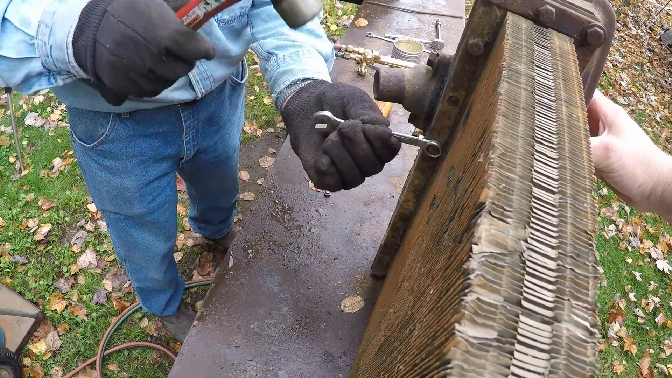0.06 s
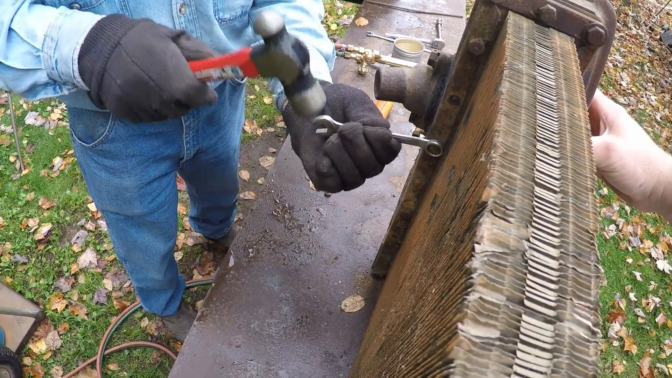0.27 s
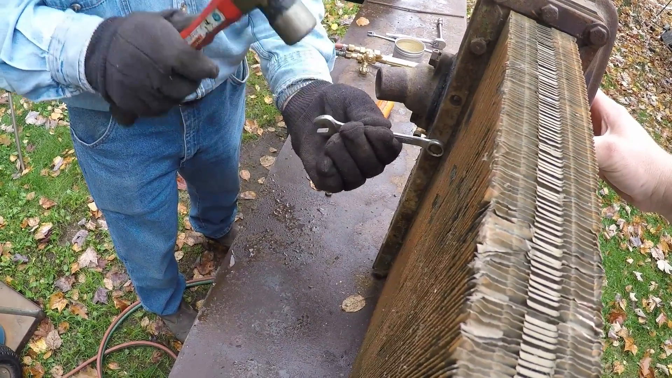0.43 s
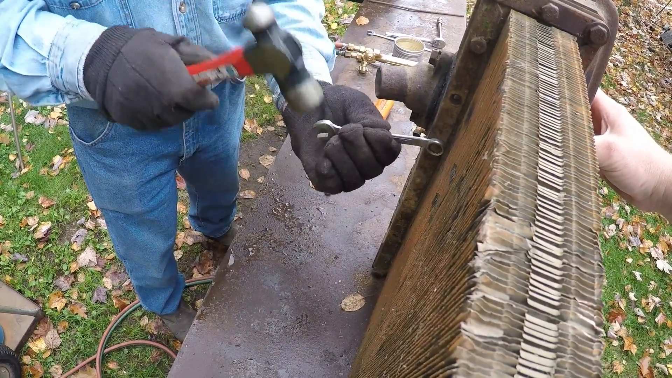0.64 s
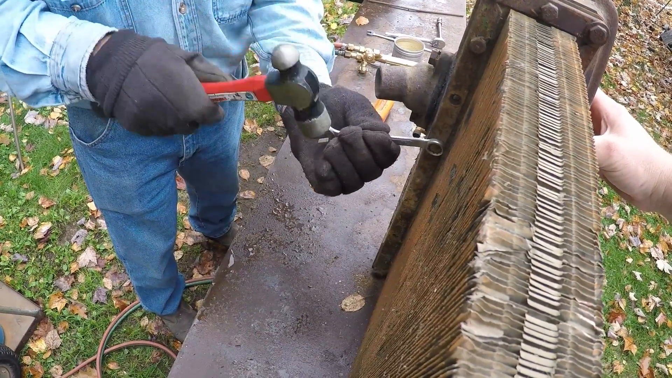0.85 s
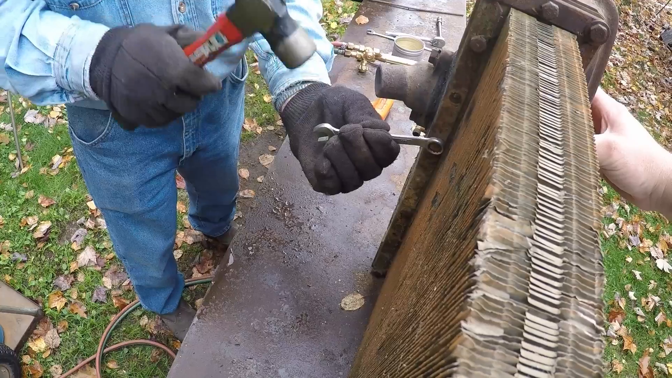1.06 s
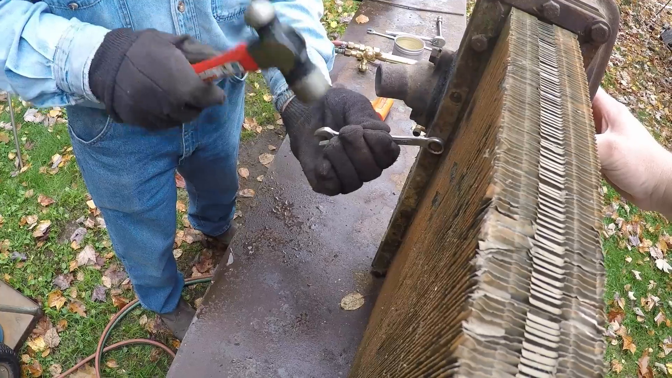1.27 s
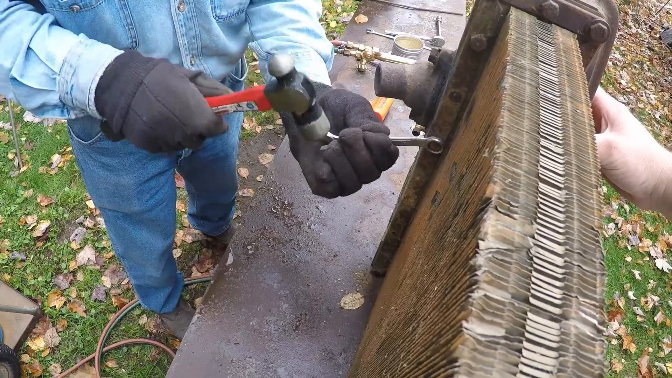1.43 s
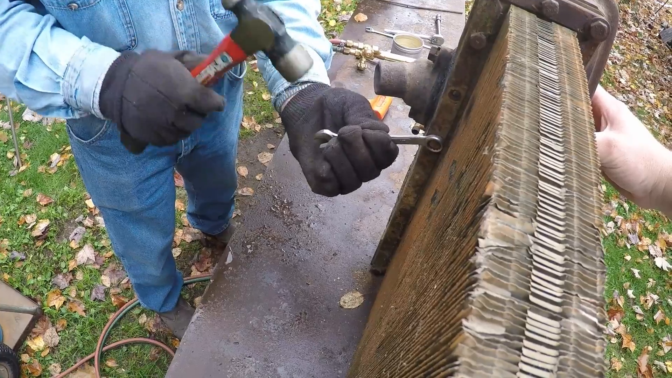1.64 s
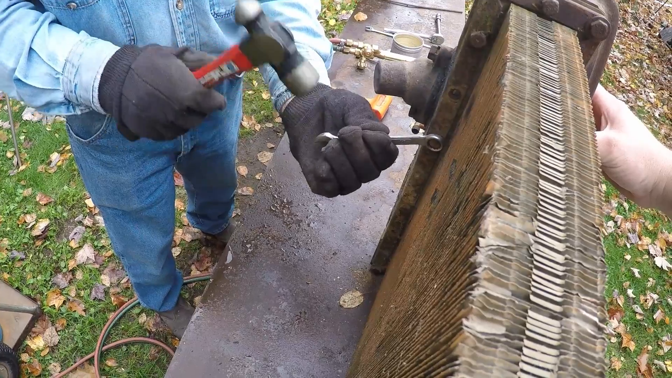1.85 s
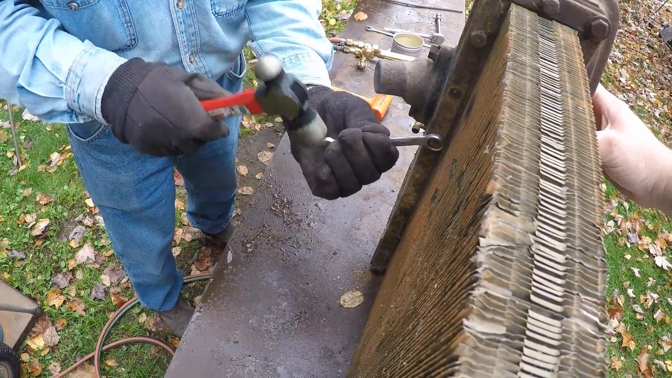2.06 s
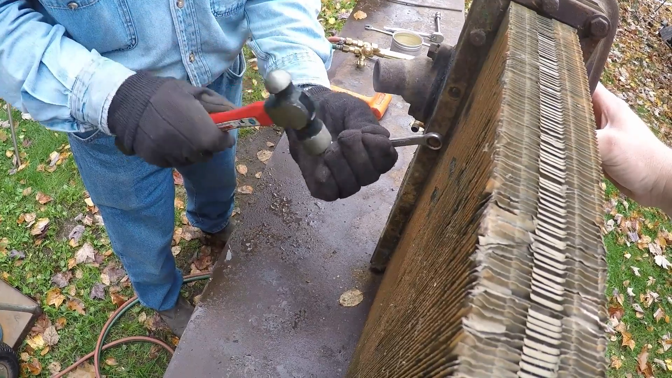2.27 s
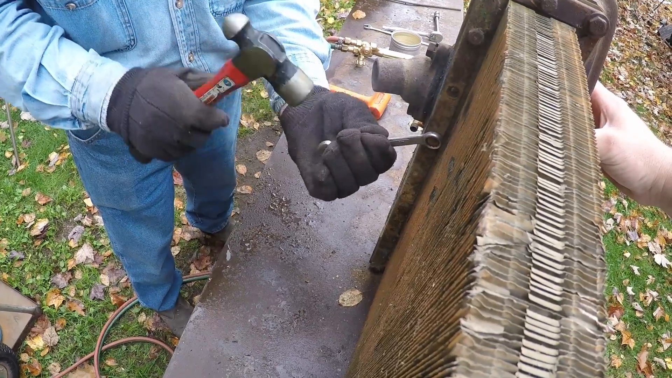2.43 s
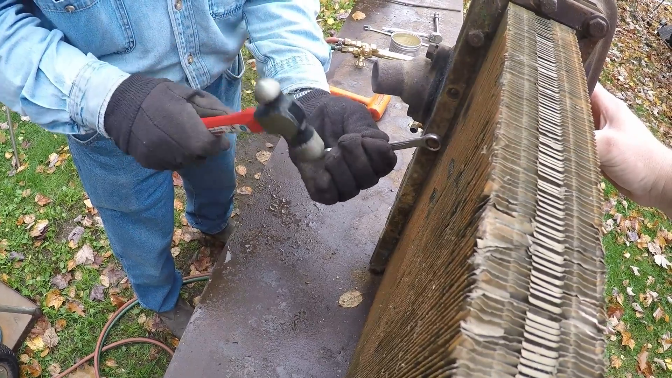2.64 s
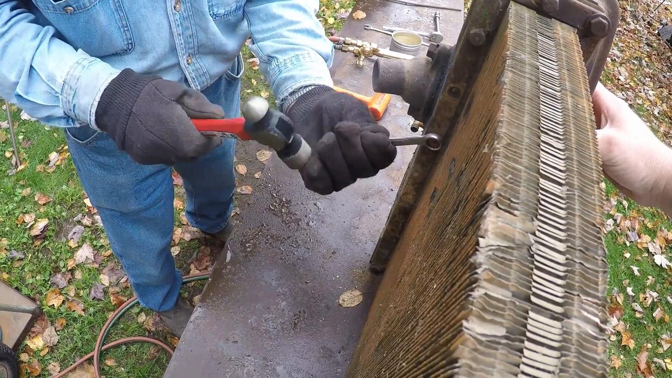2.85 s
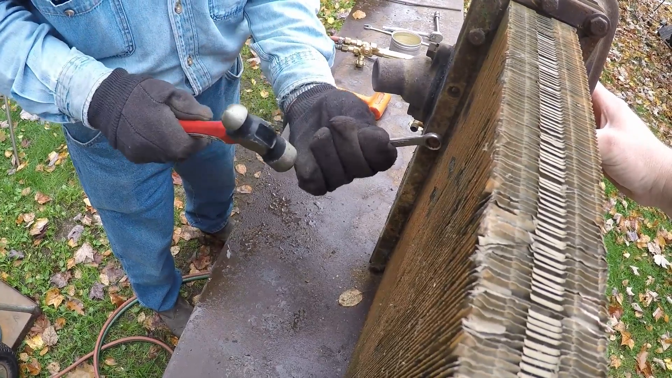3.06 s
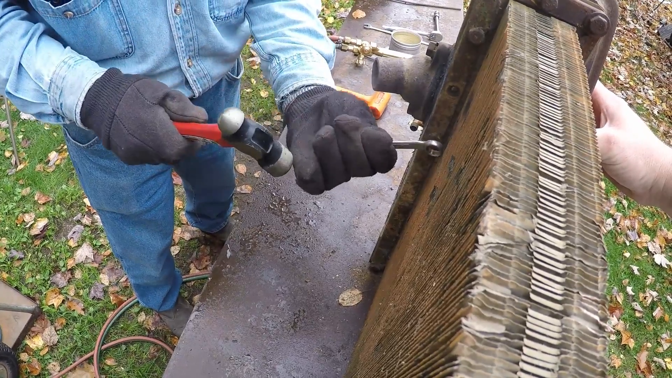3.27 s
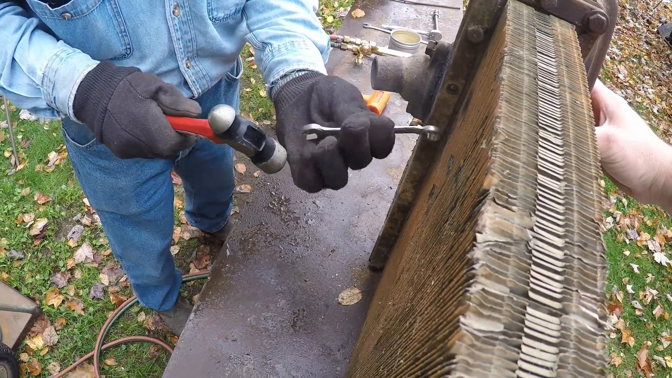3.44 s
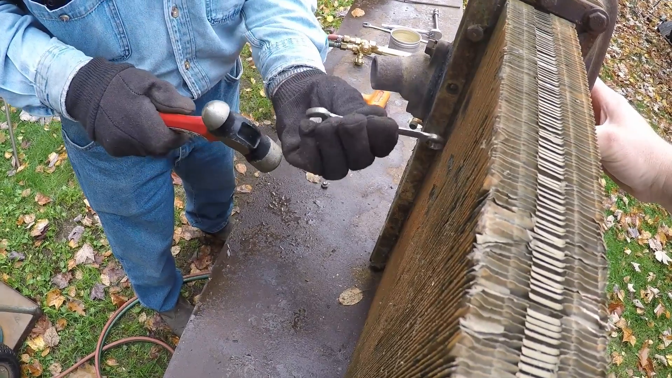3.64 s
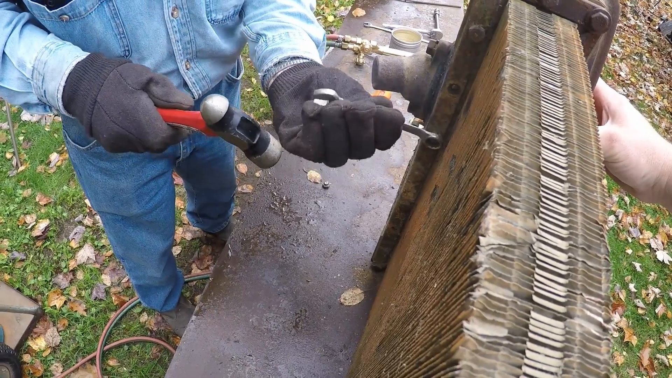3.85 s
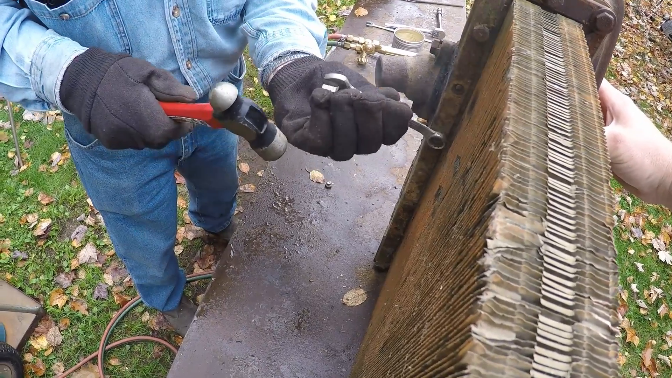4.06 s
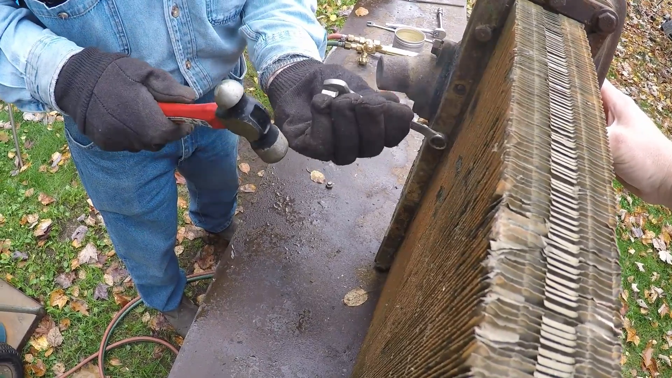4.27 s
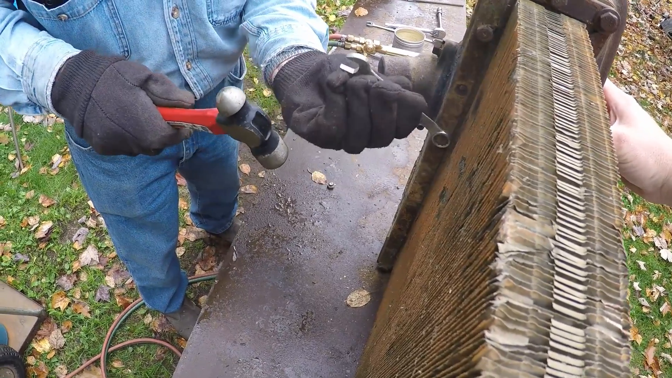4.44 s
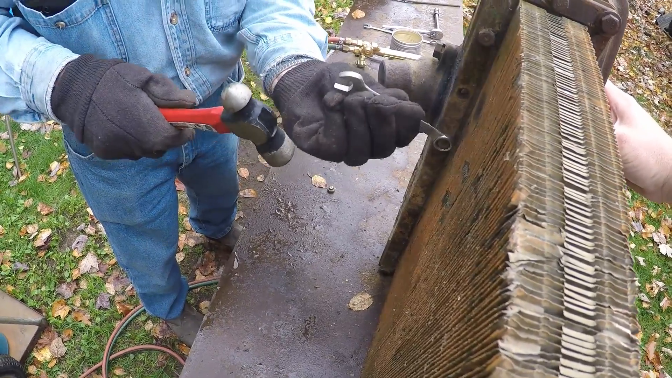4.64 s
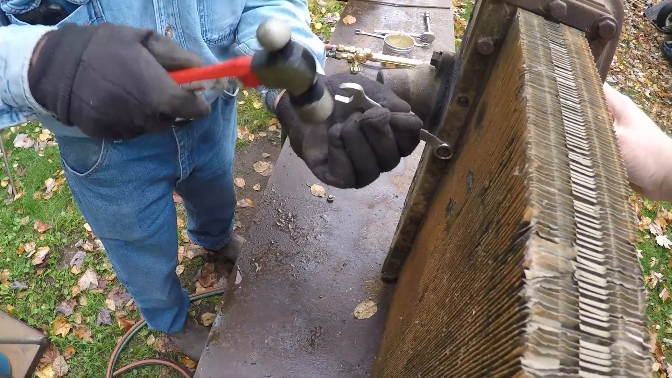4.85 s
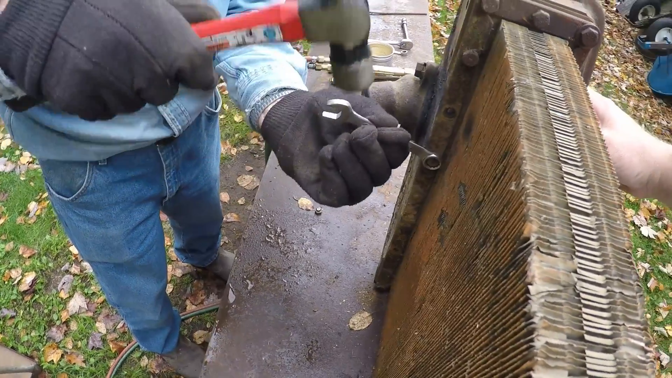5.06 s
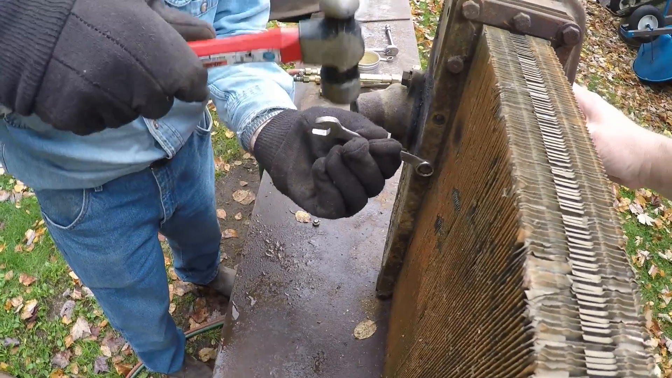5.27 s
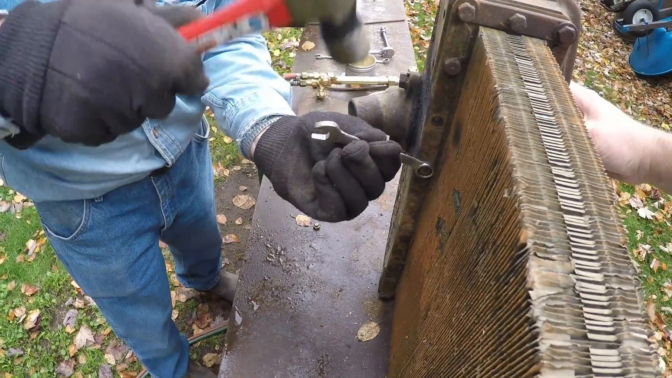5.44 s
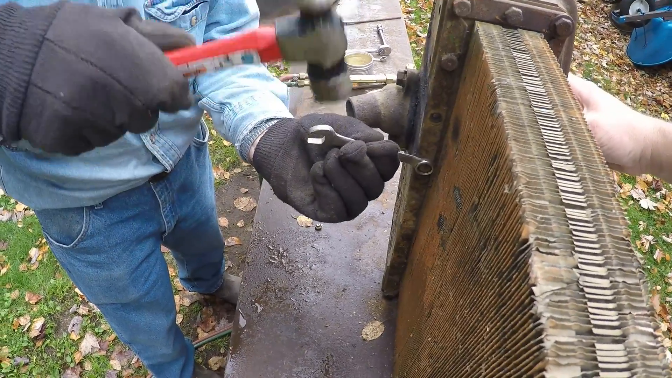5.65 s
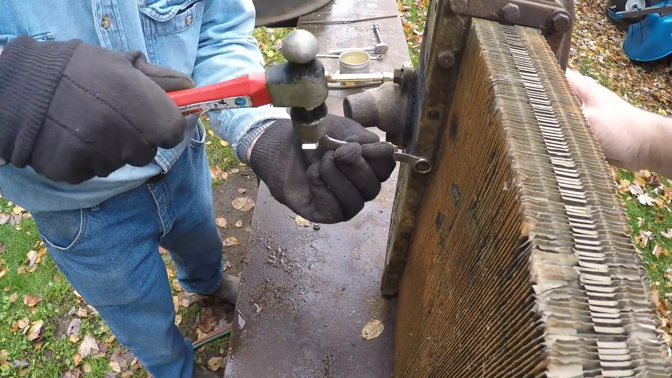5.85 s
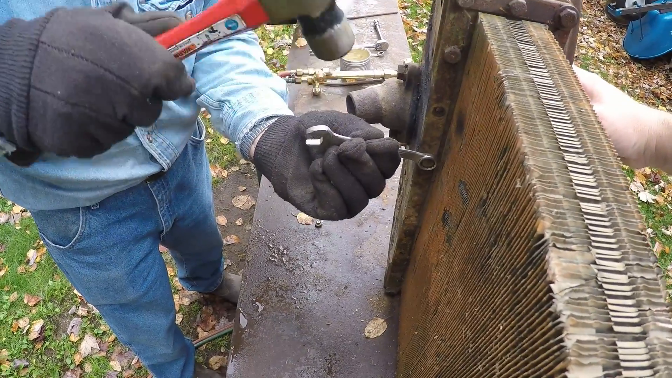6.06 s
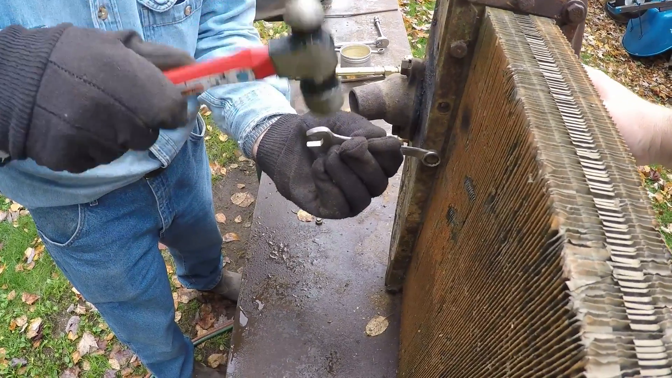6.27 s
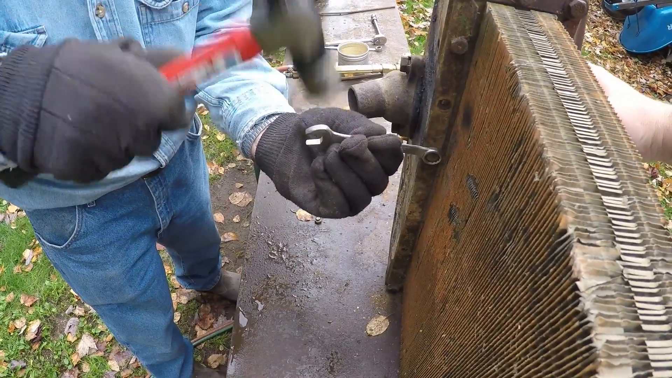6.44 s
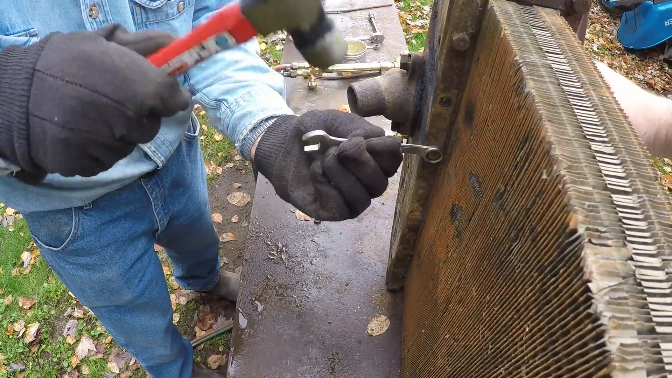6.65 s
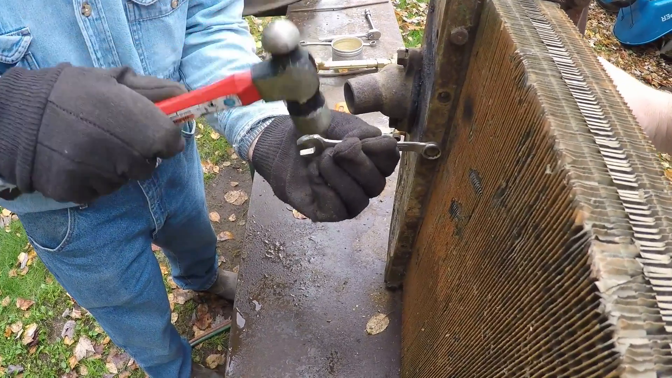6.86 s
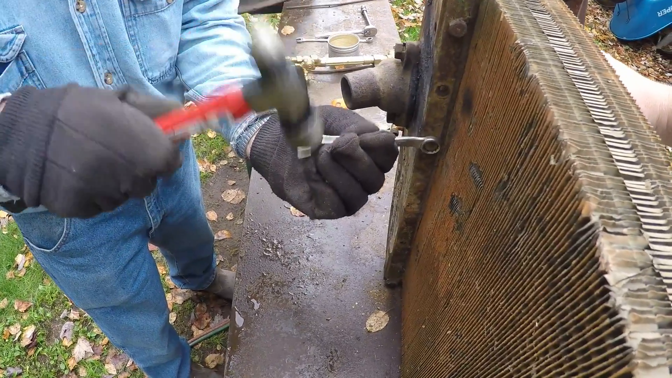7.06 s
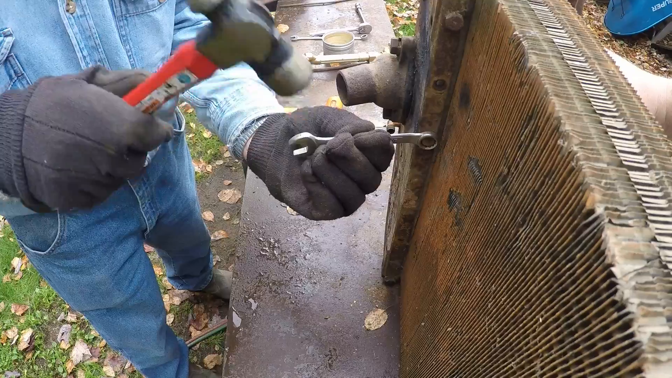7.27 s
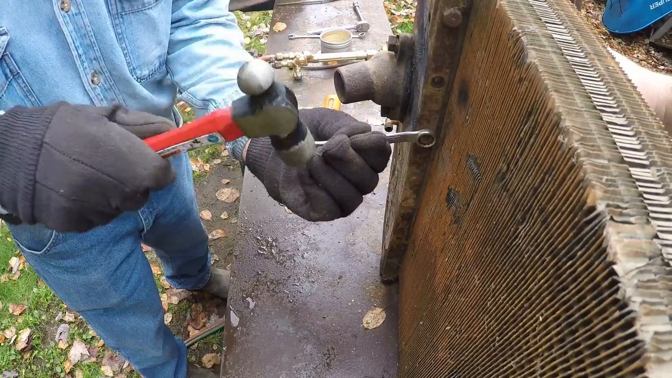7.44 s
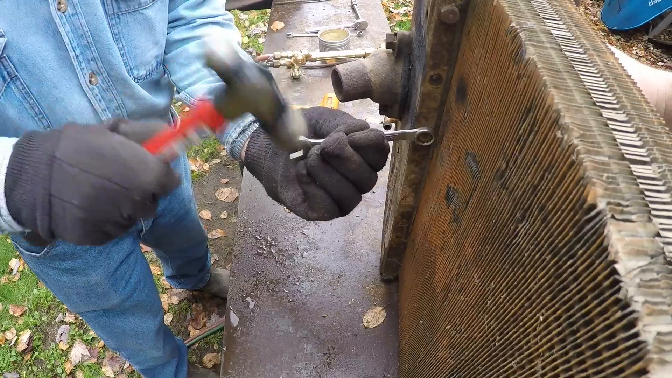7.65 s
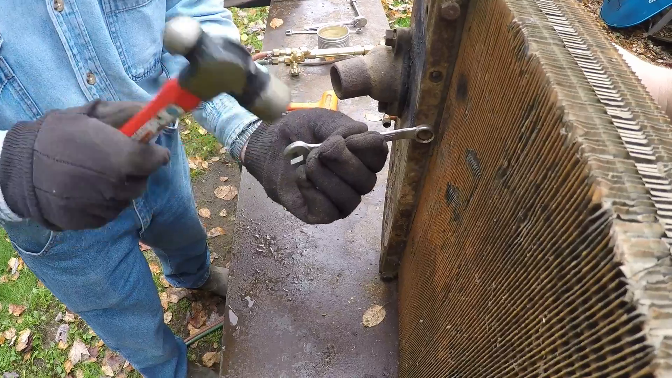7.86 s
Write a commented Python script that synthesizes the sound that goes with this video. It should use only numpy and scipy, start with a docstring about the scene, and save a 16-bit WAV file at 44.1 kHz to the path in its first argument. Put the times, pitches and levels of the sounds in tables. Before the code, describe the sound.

Close, hard hammer blows on a steel wrench held against a bolt in an old metal radiator. Nine quick sharp clanks come first, slightly speeding up, then a pause with wind thumps and two light clinks as the wrench is reseated, then nine more with a fuller, gong-like ring. Open yard, faint traffic and engine hum, microphone very near and slightly overloaded.

```python
"""Hammering a wrench on a stuck bolt

Outdoors, a hammer strikes a hand-held wrench on a bolt in a sheet-metal radiator: two runs of nine blows.
Two small clinks sound as the wrench is reseated, and four dull knocks are scattered through the scene.
Clear metal rings are fading sine waves; the clatter of the sheets is noise that dies away band by band.
Wind, far traffic and an engine drone, all shaped noise, lie underneath. Loud blows overload the input.
"""
import sys
import numpy as np
from scipy import signal
from scipy.fft import rfft, irfft
from scipy.io import wavfile
from scipy.ndimage import uniform_filter1d

SR = 44100
rng = np.random.default_rng(int(sys.argv[2]) if len(sys.argv) > 2 else 0)


def store_pcm(level_fs):
    """Save levels as 16-bit WAV."""
    pcm = np.round(np.clip(level_fs, -1, 1) * 32767).astype(np.int16)
    wavfile.write(sys.argv[1], SR, np.atleast_2d(pcm).T)


N = 348831  # length in samples

# All levels are relative unless marked rms; t60 is the time a ring takes to fade by 60 dB.
# Far traffic and hiss, tone colour: f/Hz, level per Hz/dB
AIR_COLOUR = [(29, -29), (50, 0), (91, -11), (113, -24.5), (166, -10), (197, -19.5), (436, -23), (503, -25),
              (776, -27.5), (1450, -31.5), (4720, -33.5), (12000, -47.5), (15700, -54.5)]
# Their loudness over time: t/s, hum rms level/dB, hiss rms level/dB
AIR_LEVEL = [(0.0, -47, -54), (0.9, -47.5, -55), (1.45, -46, -57), (2.6, -48, -56), (3.3, -49.5, -54.5),
             (5.07, -49, -52.5), (6.3, -44.5, -49.5), (7.14, -45.5, -49.5), (7.91, -49.5, -49.5)]
# Far idling engine, one resonance a row: f/Hz, width/Hz, rms level/dB
ENGINE = [(76.7, 2.5, -58), (156, 5.9, -59.5), (427.7, 22, -66), (788.6, 18, -68)]
# Breeze strength over time, before its random lulls: t/s, level/dB
BREEZE = [(0.0, -56.5), (1.0, -54), (3.0, -62.5), (3.4, -50.5), (4.4, -59), (4.85, -45), (5.7, -34.5),
          (5.8, -49), (7.5, -63), (7.91, -36)]
# Single gusts: middle t/s, peak level/dB, length/s
GUSTS = [(3.147, -31.5, .07), (4.029, -36, 0.04), (4.888, -46, 0.031), (4.987, -39, 0.032),
         (5.06, -25.5, 0.029), (5.23, -38, .05), (5.394, -32, .06), (5.68, -38, 0.034), (7.1, -36, .06),
         (7.846, -39, 0.034)]
# Small dull knocks: t/s, level/dB, f/Hz
KNOCKS = [(3.12, -41.5, 1760), (5.381, -35.5, 820), (5.963, -31, 797), (6.269, -39, 805)]
# Clinks as the wrench is reseated: t/s, ring level/dB, clatter level/dB, treble tilt/dB
CLINKS = [(3.7165, -36, -31, -6), (4.4237, -31, -23, 9)]
# Loose wrench on the bolt: f/Hz, level/dB, t60/s
LOOSE_WRENCH = [(1060, -10, .06), (1320, -6, .04), (1745, 0, .08), (3280, -2, .04), (5100, -9, .03),
                (6700, -9, .03), (8100, -12, .04)]
# Clatter of the sheet metal, tone colour: f/Hz, level per Hz/dB
CLATTER_COLOUR = [(150, -32.5), (700, -55), (1100, -37.5), (1680, -12.5), (2210, -19), (3340, -4),
                  (5050, -10), (8500, -8.5), (11000, -15), (14300, -14.5), (15800, -35.5), (16400, -42)]
# How fast the clatter dies: f/Hz, t60/s
CLATTER_T60 = [(700, 0.17), (3000, 0.035), (6000, 0.03), (9000, 0.024), (15000, 0.0057)]
# Looser sheets, level against the clatter: f/Hz, level/dB
RATTLE_LEVEL = [(200, 1.5), (500, 21.5), (1200, -29), (3000, -19), (6000, -14), (9000, -19.5),
                (15000, -33.5)]
# How fast the looser sheets die: f/Hz, t60/s
RATTLE_T60 = [(700, 0.41), (3000, 0.04), (9000, 0.084), (15000, .1)]
# Scatter from the yard, level against the clatter: f/Hz, level/dB
YARD_LEVEL = [(700, -20.5), (3000, -35.5), (6000, -41), (9000, -54.5), (15000, -46)]
# Long shimmer of the thin fins, fade time across frequency before random spread: f/Hz, t60/s
FINS_T60 = [(1000, 0.28), (4000, 0.14), (9000, 0.66), (15000, .3)]
# Ring level of the fins across frequency: f/Hz, level/dB
FINS_LEVEL = [(2500, -63), (5500, -65), (7200, -63), (8400, -74), (9600, -70), (10500, -78), (12500, -78)]
# Frame of the radiator, swelling in slowly: f/Hz, level/dB, t60/s
FRAME = [(139, -42, 0.13), (212.5, -33, .15), (234.5, -43.5, 0.55), (264.7, -46.5, 0.67), (349, -45, 0.13),
         (476.7, -32.5, 0.11), (531, -37, 0.046)]
# Gong-like ring of the tank: f/Hz, level/dB, t60/s
GONG = [(1032, -33.5, 0.17), (1100, -37, 0.099)]
# Body of the tank: f/Hz, level/dB, t60/s
BODY = [(1262, -26, 0.027), (1418, -32, 0.083), (1475, -33.5, 0.14), (1624, -26.5, 0.07),
        (1709, -28.5, 0.12), (1730, -14.5, 0.047), (1775, -26, 0.12), (1838, -35.5, 0.095),
        (1844, -36.5, 0.17)]
# Wrench: f/Hz, level/dB, t60/s
WRENCH = [(2675, -35, .1), (2800, -25, .08), (2910, -32, .1), (3140, -27, .09), (3235, -32, .1),
          (3700, -35, .11), (3752, -30, .12), (4152, -27, .09), (4340, -28, .07), (4890, -29, .07),
          (7025, -40, .1), (7432, -27, .06), (8247, -29, .05), (9400, -33, .06)]
# Jaw of the wrench: f/Hz, level/dB, t60/s
JAW = [(812, -52, .08), (2222, -49, .25), (2500, -38, .07), (5808, -45, .11), (6136, -62, .35)]
# Four groups of long rings, each with rows of: f/Hz, level/dB, t60/s
LONG_RINGS = [
    [(3392, -35, .28), (3453, -52, .4)],
    [(3648, -41, .34)],
    [(4500, -38, .22), (4540, -39, .15), (8021, -46, .17), (9760, -60, .3)],
    [(6860, -47, .3), (6495, -45, .22), (4836, -51, .32), (9955, -62, .27)],
]
# Share of the grip's slack that each long-ring group follows (no unit)
LONG_RINGS_SLACK = [1, 0, .85, 1]
# Gain of each long-ring group per unit of landing spot: level/dB
LONG_RINGS_SPOT = [-1, 5.5, 3, 5]
# As the bolt turns, tank body, jaw, fins and long rings drift steadily through a run.
# Tank body, one row per run: first blow level/dB, step per blow/dB
BODY_DRIFT = [(2.9, -0.6), (6.1, -0.88)]
# Jaw, same columns: first blow level/dB, step per blow/dB
JAW_DRIFT = [(-1.7, 2.45), (-1.7, -.2)]
# Fins, same columns: first blow level/dB, step per blow/dB
FINS_DRIFT = [(2.5, -.4), (-3.5, -.1)]
# Long rings, two runs for each group: first blow level/dB, step per blow/dB
LONG_RINGS_DRIFT = [
    [(.8, -.4), (7.6, -1.6)],
    [(4, -1), (2, -1.75)],
    [(5.9, -2.4), (3.9, -.8)],
    [(-6.8, 1), (-4.9, 1)],
]
# The blows, nine to a run: t/s, strength/dB, tank gong level/dB, slack of the glove's grip/dB,
# landing spot (about -1 to 1), treble tilt/dB
BLOWS = [(0.2003, 1.3, -1.5, -0.5, -1.1, 0.5), (0.5336, 0.6, -0.5, 3.5, -.45, 1),
         (0.8674, 0.7, -1.5, -2, .3, 3), (1.156, -1, -2, -2.5, 1, 0.5), (1.4593, 0, -1.5, 0, 0.82, 1),
         (1.7271, -0.2, -3.5, -3, 1, -1.5), (2.0121, 0, -5.5, 1.5, -.35, 1),
         (2.2766, -0.5, -16, 4, -0.17, -0.5), (2.5338, -0.4, -21, 2.5, -0.82, 2.5),
         (5.148, -3, 5.5, -6.5, -0.67, -1.5), (5.5263, 1.5, 3.5, 1.5, 0.36, -1.5),
         (5.8667, 1.3, 3, 2, 0.53, 1), (6.1773, 2.3, 0.5, 2.5, -0.3, -1), (6.4934, 0.8, 6, .5, 0.61, 1),
         (6.7938, 1, 4, 3.5, .1, -2.5), (7.095, 1.5, 3.5, 2, -0.14, -0.5),
         (7.4057, 0.5, 5, 1.5, -0.16, 2.5), (7.696, 0.2, 6, -3, 0.32, 0.5)]

LULL_DB = 3.5  # random rise and fall of the breeze
LUMPS_DB = 4.0  # random unevenness of the clatter's tone colour
EDGE_HZ = 16500  # upper band limit


def amp(db):
    """Turns dB into a plain gain."""
    return 10 ** (np.asarray(db) / 20)


def evened(x):
    """Scales a signal to an rms of 1."""
    return x / np.sqrt(np.mean(x ** 2) + 1e-20)


def read(points, hz):
    """Reads between the points of a (f/Hz, value) table, on a log-frequency axis."""
    f, value = np.transpose(points)
    return np.interp(np.log(hz + 1), np.log(f + 1), value)


def add(mix, s, sound):
    """Mixes a sound in at s seconds."""
    part = mix[round(s * SR):][:len(sound)]
    part += sound[:len(part)]


def ring(modes, t, scatter_db, detune):
    """Struck metal as fading sines; each mode's level and pitch vary a little by chance."""
    hz, db, t60 = np.transpose(modes)[:, :, None]
    level_chance, pitch_chance, start_turns = rng.standard_normal((3, len(modes), 1))
    phase = 2 * np.pi * (hz * (1 + detune * pitch_chance) * t + start_turns)
    fading = amp(db + scatter_db * level_chance - 60 * t / t60)
    return (fading * np.sin(phase)).sum(0)


def air():
    """Far traffic hum and a soft hiss: coloured noise in drifting patches."""
    hz = np.fft.rfftfreq(1024, 1 / SR)
    real, imaginary, patches = rng.standard_normal((N // 256 + 5, 513, 3)).T
    patches = uniform_filter1d(patches, size=6, axis=0)  # smooth over frequency
    patches = evened(uniform_filter1d(patches, size=20, axis=1))  # smooth over time
    spectrum = (real + 1j * imaginary) * amp(read(AIR_COLOUR, hz)[:, None] + 1.1 * patches)
    low_share = 1 / (1 + (hz[:, None] / 630.0) ** 4)

    def layer(share):
        """One part of the spectrum as sound, at rms 1."""
        return evened(signal.istft(spectrum * share, nperseg=1024, noverlap=768)[1][:N])

    t = np.arange(N) / SR
    s, hum_db, hiss_db = np.transpose(AIR_LEVEL)
    hum = amp(np.interp(t, s, hum_db)) * layer(low_share)
    hiss = amp(np.interp(t, s, hiss_db)) * layer(1 - low_share)
    return hum + hiss


def engine():
    """Noise through a few narrow resonances makes an unsteady drone."""
    hz = np.fft.rfftfreq(N, 1 / SR)
    noise = rfft(rng.standard_normal(N))
    drone = np.zeros(N)
    for f, width, db in ENGINE:
        resonance = 1 / (1 + (2 * (hz - f) / width) ** 2)
        drone += amp(db) * evened(irfft(noise * resonance, N))
    return drone


def wind():
    """A wavering breeze and single gusts push the microphone at a few tens of hertz."""
    t, hz = np.arange(N) / SR, np.fft.rfftfreq(N, 1 / SR)
    shape = (hz / 24.0) ** 2 / (1 + (hz / 36.0) ** 2) / (1 + (hz / 26.0) ** 3)
    push = evened(irfft(rfft(rng.standard_normal(N)) * shape, N))
    # level out the chance swells, so the tables set the strength
    steady = evened(push / np.sqrt(uniform_filter1d(push ** 2, size=3000) + 0.15))
    lulls = evened(irfft(rfft(rng.standard_normal(N)) / (1 + (hz / 6.0) ** 2), N))
    breeze = amp(np.interp(t, *np.transpose(BREEZE)) + LULL_DB * lulls)
    gusts = sum(amp(db) * np.exp(-(2 * (t - s) / length) ** 2) for s, db, length in GUSTS)
    return (breeze + gusts) * steady


def knock(t, db, hz):
    """A short cluster of three close tones sounds like a dull knock."""
    tones = [(hz * k, -1.1, 0.07) for k in (0.9, 1, 1.12)]
    return amp(db - 4.5) * ring(tones, t, 2.7, 0.056) * (1 - np.exp(-t / 0.0051))


def high_pass(x):
    """A high-pass filter keeps deep rumble out of the clatter."""
    return signal.sosfilt(signal.butter(2, 130, "high", fs=SR, output="sos"), x)


def clatter(t, bright_db):
    """Sheet metal has too many modes to count: noise dying band by band, uneven from blow to blow."""
    noise = high_pass(rng.standard_normal(len(t)))
    hz, frame_s, spectrum = signal.stft(noise, SR, nperseg=128)
    tilt_db = bright_db * np.clip(np.log2(hz / 4600.0 + 1e-9), 0, 1)
    lumps_db = LUMPS_DB * rng.standard_normal(len(hz))
    colour = amp(read(CLATTER_COLOUR, hz) + tilt_db + lumps_db)[:, None]

    def burst(start_s):
        """Fast-dying clatter from one landing of the hammer."""
        fade_db = -60 * (frame_s - start_s) / read(CLATTER_T60, hz)[:, None]
        return (frame_s > start_s) * amp(fade_db)

    first = burst(-1e-4)
    rebound = 0.25 * burst(0.0042)  # the hammer bounces and lands once more
    loose = amp(read(RATTLE_LEVEL, hz)[:, None] - 60 * frame_s / read(RATTLE_T60, hz)[:, None])
    yard = amp(read(YARD_LEVEL, hz)[:, None] - 60 * frame_s / 0.77)  # t60 0.77 s
    shaped = spectrum * colour * (first + rebound + loose + yard)
    return signal.istft(shaped, SR, nperseg=128)[1][:len(t)]


def clink(t, ring_db, clatter_db, bright_db):
    """The reseated wrench touches the bolt: short loose rings and some clatter."""
    modes = []
    for hz, db, t60 in LOOSE_WRENCH:
        tilt_db = bright_db * np.clip(np.log2(hz / 4000.0), 0, 1)
        modes.append((hz, db + tilt_db, t60))
    sound = amp(ring_db) * ring(modes, t, 2.1, 0.0016) + amp(clatter_db) * clatter(t, bright_db)
    return sound * (1 - np.exp(-t / 0.00021))


def fins(t, count=160):
    """Many thin fins ring faintly at random pitches; every blow shakes a different mix of them."""
    hz = np.exp(rng.uniform(np.log(2500), np.log(12500), (count, 1)))
    t60 = read(FINS_T60, hz) * rng.uniform(0.5, 1.3, (count, 1))
    rings = amp(read(FINS_LEVEL, hz) - 60 * t / t60) * np.exp(2j * np.pi * hz * t)
    shake = rng.standard_normal((len(BLOWS), count, 2)) @ [1, 1j]  # random strength and phase
    return (shake @ rings).real * (1 - np.exp(-t / 0.004))


def drift(runs, index):
    """Gain of a drifting part at a blow, from its run's first level and step."""
    first_db, step_db = runs[index // 9]
    return amp(first_db + step_db * (index % 9))


def tool_ring(t, index, slack_db, spot):
    """Wrench, jaw and long rings; grip and landing spot change the long ones."""
    tool = ring(WRENCH, t, 3.0, 0.003) + drift(JAW_DRIFT, index) * ring(JAW, t, 1.2, 0.0005)
    groups = zip(LONG_RINGS, LONG_RINGS_DRIFT, LONG_RINGS_SLACK, LONG_RINGS_SPOT)
    for modes, runs, share, spot_db in groups:
        gain = drift(runs, index) * amp(share * slack_db + spot_db * spot)
        tool = tool + gain * ring(modes, t, 1.1, 0.0004)
    return tool


def tank_ring(t, index, gong_db):
    """The tank's gong and body ring build up a little later than the wrench."""
    gong = amp(gong_db) * ring(GONG, t, 0.9, 0.003)
    body = drift(BODY_DRIFT, index) * ring(BODY, t, 2, 0.008)
    return (gong + body) * (1 - np.exp(-t / 0.003))


def blow(t, index, shimmer, db, gong_db, slack_db, spot, bright_db):
    """The blow runs through wrench and bolt into the tank, frame and fins."""
    quick = tool_ring(t, index, slack_db, spot) + amp(1.25) * clatter(t, bright_db)
    quick = quick * (1 - np.exp(-t / 0.00094))
    tank = tank_ring(t, index, gong_db)
    frame = ring(FRAME, t, 2.5, 0.015) * (1 - np.exp(-(t / 0.022) ** 2))
    return amp(db + 6) * (quick + tank + frame + drift(FINS_DRIFT, index) * shimmer)


def scene():
    """Knocks, clinks and blows over air, engine and wind."""
    mix = air() + engine() + wind()
    t = np.arange(SR // 2) / SR  # each strike lasts half a second
    for s, db, hz in KNOCKS:
        add(mix, s, knock(t, db, hz))
    for s, *settings in CLINKS:
        add(mix, s, clink(t, *settings))
    for index, (shimmer, (s, *settings)) in enumerate(zip(fins(t), BLOWS)):
        add(mix, s + 0.00063, blow(t, index, shimmer, *settings))  # 0.63 ms after the table time
    return mix[None]


def record(dry):
    """The input stage overloads with a firm knee; then a low-pass filter limits the band."""
    clipped = dry / (1 + abs(dry / 0.9) ** 4) ** 0.25
    low_pass = signal.firwin(1023, EDGE_HZ, window=("kaiser", 12), fs=SR)
    return signal.oaconvolve(clipped, low_pass[None], "same")


dry = scene()
out = record(dry)
store_pcm(out)
```